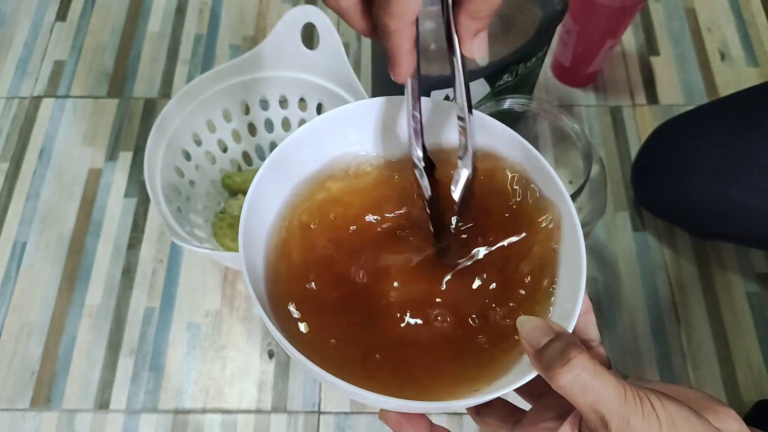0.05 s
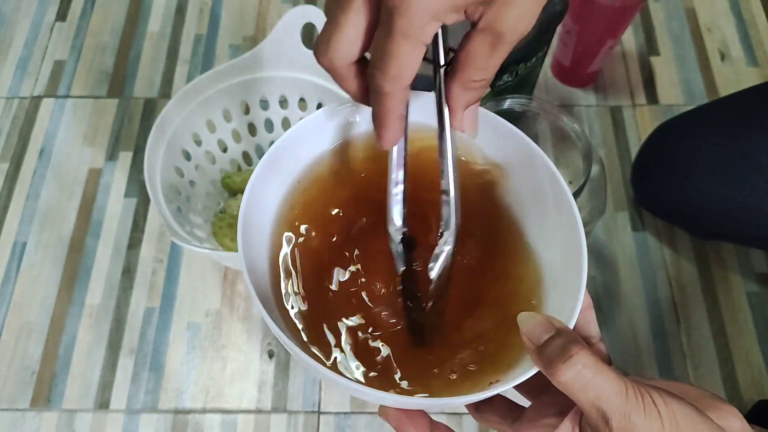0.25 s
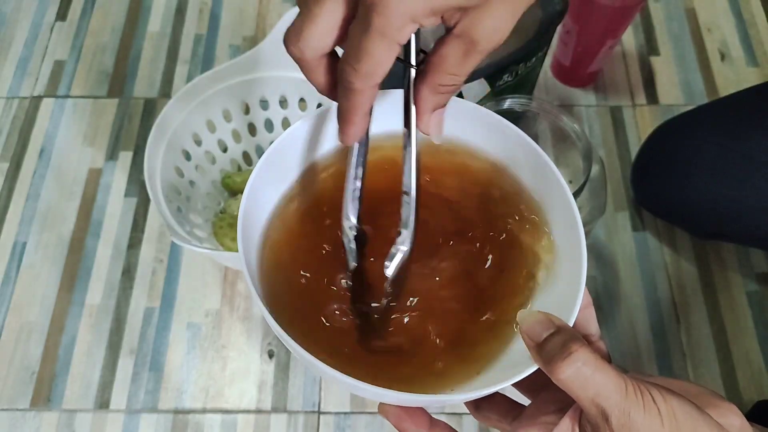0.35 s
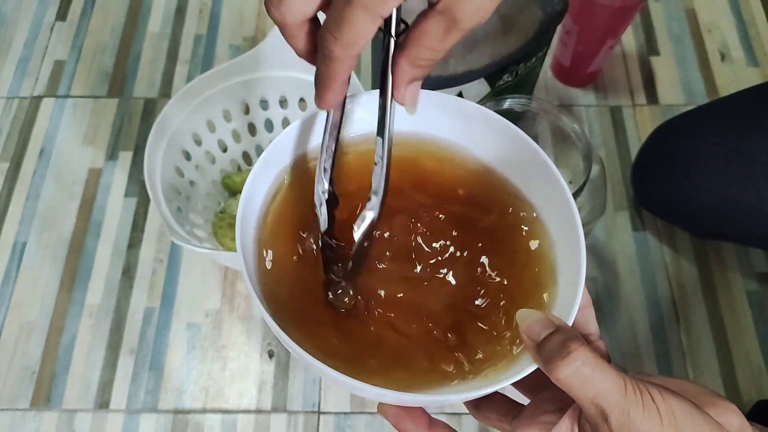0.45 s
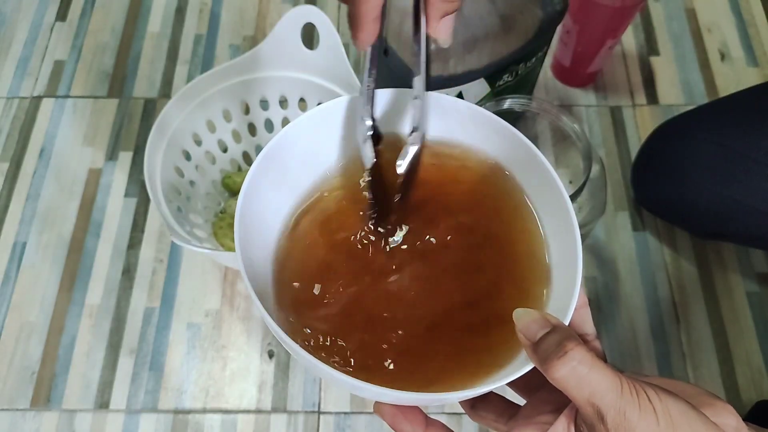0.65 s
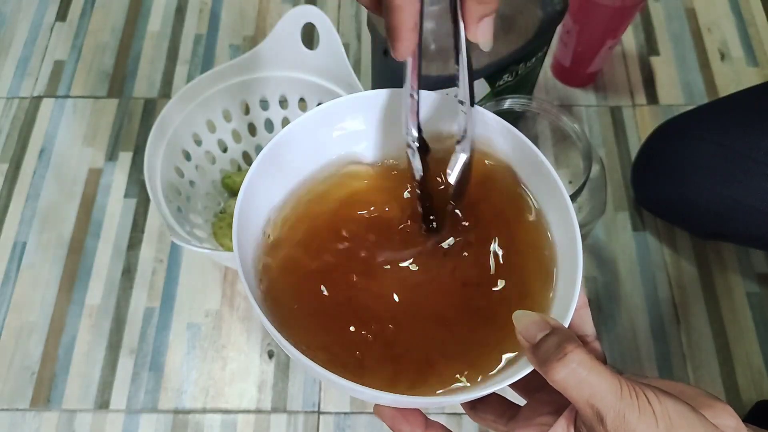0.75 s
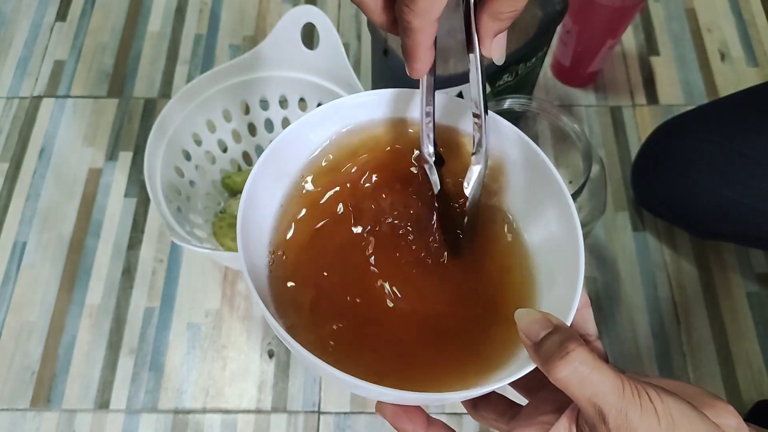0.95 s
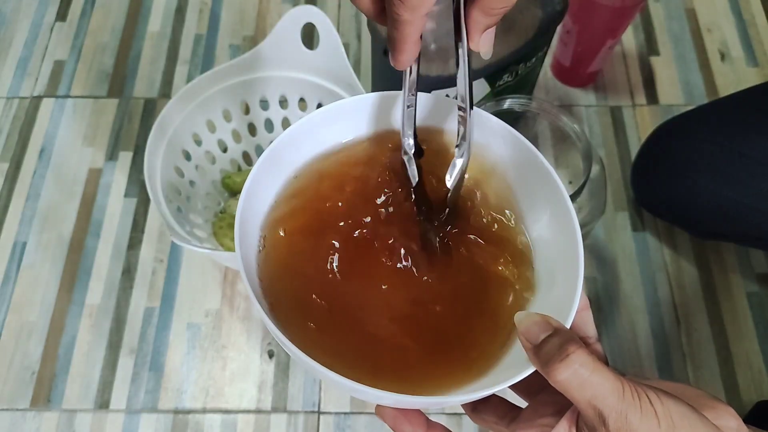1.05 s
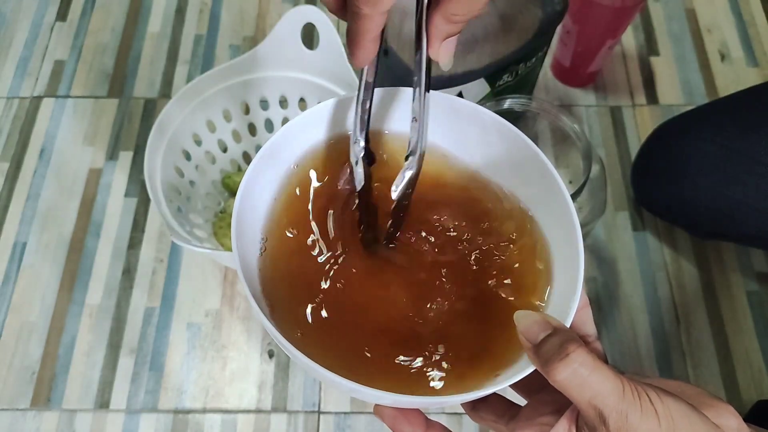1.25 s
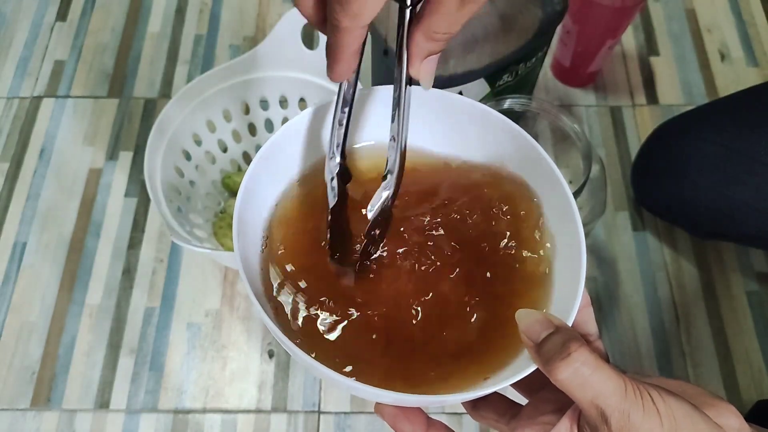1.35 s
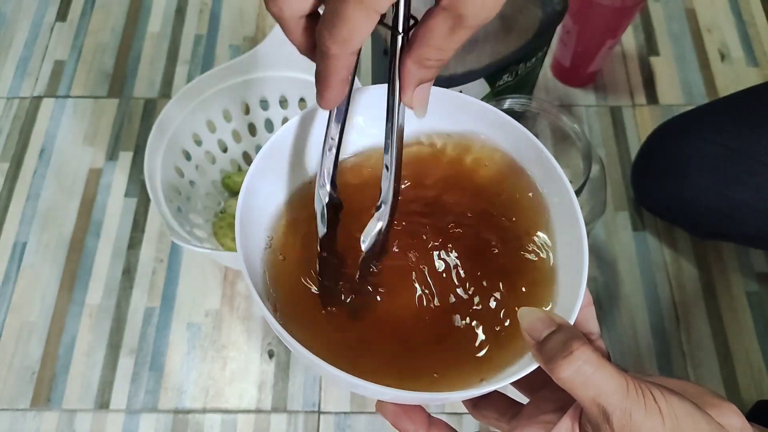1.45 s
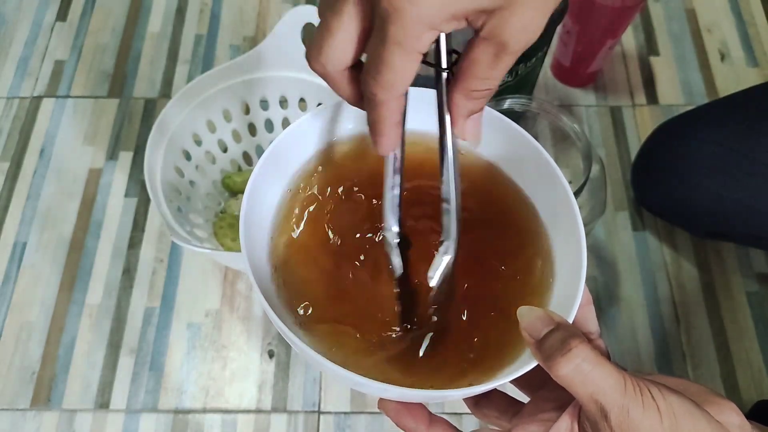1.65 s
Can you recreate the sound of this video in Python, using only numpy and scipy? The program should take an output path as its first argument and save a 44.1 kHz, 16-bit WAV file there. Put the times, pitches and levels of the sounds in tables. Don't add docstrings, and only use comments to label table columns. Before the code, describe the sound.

Metal tongs stirring sugary liquid in a thin plastic bowl: gritty scraping, irregular dull clicks and taps, a faint metallic ring early, louder knocks and a short squeak midway, then softer ticks; close stereo, quiet kitchen.

```python
import sys
import numpy as np
from scipy import signal
from scipy.fft import rfft, irfft
from scipy.io import wavfile
from scipy.ndimage import uniform_filter1d

SR = 44100
rng = np.random.default_rng(int(sys.argv[2]) if len(sys.argv) > 2 else 0)


def volts_from_decibels(level):
    exponent = np.asarray(level, float) / 20
    return 10 ** exponent


def pcm_store(signal):
    levels = np.round(np.clip(np.atleast_2d(signal), -1, 1) * 32767)
    wavfile.write(sys.argv[1], SR, levels.astype(np.int16).T)


N = 74970

# pitch [Hz], level [dB], t60 [s].
BOWL = [(342, -12, 0.14), (505.5, -12, 0.13), (783, -6, 0.2), (1000, -9.5, 0.026), (1182, -11.5, 0.14),
        (1620, -6, 0.051), (1910, 0, 0.02), (2290, -9, 0.013), (2330, -9, 0.27), (2470, -3.5, 0.035),
        (2710, -1, 0.027), (3064, -6.5, 0.1), (3250, -1.5, 0.015), (3847, -3, 0.026)]
# pitch [Hz], level [dB], t60 [s], left minus right [dB].
ARMS = [(3600, -20, .2, 0), (4388, -8, .35, -11), (4452, -1, .3, -12), (4510, -5, .3, -12),
        (5460, -17, .15, 0), (6710, -10, .25, 0), (6779, -2, .19, 2), (6848, -6, .19, 2),
        (8085, -16, .13, 3), (8878, -11, .19, 8), (9085, -11, .1, 8), (10530, -20, .2, 6),
        (12320, -22, .2, 0), (13345, -15, .25, -1)]

LAG_S, LEFT_DB, SPREAD_RAD = 6.6e-5, -2, 0.7
ARMS_TURN_RAD = 1.9
LOOSE_DB = -12.5


def evened(x):
    return x / np.sqrt(np.mean(x ** 2) + 1e-20)


def shaped(x, points):
    f, level = np.transpose(points)
    hz = np.fft.rfftfreq(x.shape[-1], 1 / SR)
    gain = volts_from_decibels(np.interp(np.log(hz + 1), np.log(f + 1), level))
    return irfft(rfft(x) * gain, x.shape[-1])


def fine(x, hz=4470):
    return signal.sosfilt(signal.butter(4, hz, "high", fs=SR, output="sos"), x)


def add(mix, s, sound):
    part = mix[..., max(round(s * SR), 0):][..., :sound.shape[-1]]
    part += sound[..., :part.shape[-1]]


def ports(left_db, turn):
    gain = volts_from_decibels(np.array([[left_db / 2], [-left_db / 2]]))
    return gain * np.exp(0.5j * turn * np.array([[-1], [1]]))


def lag_turn(hz):
    return 2 * np.pi * hz * LAG_S


def ring(x, hz, t60, left_db, twist):
    r = 10 ** (-3 / (t60 * SR))
    z = signal.lfilter([np.sqrt(1 - r * r)], [1, -r * np.exp(2j * np.pi * hz / SR)], x)
    return (ports(left_db, lag_turn(hz) + SPREAD_RAD * twist) * z).imag


def grit(size):
    grains_per_s, spread_db = 5000, 3
    u, e, g = rng.random(size), rng.exponential(1, size), rng.standard_normal(size)
    snaps = (u < grains_per_s / SR) * volts_from_decibels(spread_db * np.minimum(e, 3.5)) * np.sign(g)
    return evened(snaps + 0.054 * g)


def small_modes():
    # frequency [Hz], density [dB per Hz].
    colour = [(200, 6), (600, -19), (800, 1.5), (1500, -1.5), (3000, -1), (4400, -12), (7000, -8),
              (15800, -25.5)]
    t60, shared = 0.06, 0.36
    t = np.arange(3000) / SR
    a, b = rng.standard_normal(3000), rng.standard_normal((2, 3000))
    decaying = (shared * a + (1 - shared) * b) * volts_from_decibels(-60 * t / t60)
    return evened(shaped(decaying, colour)) / np.sqrt(3000)


def late(x):
    hz = np.fft.rfftfreq(len(x), 1 / SR)
    y = signal.fftconvolve(x[None], small_modes(), axes=1)[:, :len(x)]
    return irfft(rfft(y) * ports(LEFT_DB, lag_turn(hz)), len(x))


def bowl(x, hz, reach, twists, damp):
    out = 0
    for (f, db, t60), twist in zip(BOWL, twists):
        nearness = 0.066 + np.exp(-0.5 * (np.log2(f / hz) / reach) ** 2)
        out = out + volts_from_decibels(db) * nearness * ring(x, f, t60 * damp, LEFT_DB, twist)
    return out


def arms(x):
    out = 0
    for hz, db, t60, left_db in ARMS:
        twist = (ARMS_TURN_RAD - lag_turn(hz)) / SPREAD_RAD
        out = out + volts_from_decibels(db) * ring(x, hz, t60, left_db, twist)
    return out


def drag(twists):
    # time [s], pressure [dB], fine grit [dB].
    path = [(0, -30.5, -17), (.06, -44.5, -3.5), (.14, -48.5, 7.5), (.185, -35.5, -1), (.203, -36.5, -9),
            (0.214, -34, 3), (.3, -39, 0), (.45, -35, -9.5), (.53, -39, -14), (.615, -52.5, -21),
            (.66, -37.5, -19), (.78, -40, -8.5), (.88, -30, -34), (.95, -39.5, -22), (1.05, -43, -3.5),
            (1.17, -44, -8), (1.3, -47, -7), (1.418, -47, -24), (1.455, -75, -25), (1.5, -50.5, -18)]
    wander_db, wander_s = 4.5, 0.051
    s, press_db, fine_db = np.transpose(path)
    t = np.arange(N) / SR
    x = grit(N) * volts_from_decibels(np.interp(t, s, press_db))
    wander = uniform_filter1d(rng.standard_normal((len(BOWL), N)), round(wander_s * SR), axis=1)
    modes = 0
    for (hz, db, t60), v, twist in zip(BOWL, wander, twists):
        modes = modes + volts_from_decibels(db) * ring(x * volts_from_decibels(wander_db * evened(v)), hz, t60, LEFT_DB, twist)
    spots = np.arange(N) // 4000 % 3 == np.arange(3)[:, None]
    loose = sum(late(x * spot) for spot in spots)
    top = x * volts_from_decibels(np.interp(t, s, fine_db))
    crackle = sum(fine(late(top * spot)) for spot in spots)
    return volts_from_decibels(-18.5) * modes + volts_from_decibels(LOOSE_DB) * loose + volts_from_decibels(6) * crackle + volts_from_decibels(-15) * arms(top)


def air():
    # frequency [Hz], density [dB per Hz].
    colour = [(20, 0), (90, -13), (300, -9.5), (600, -24), (2800, -14), (5000, -24.5), (7000, -23),
              (15800, -26)]
    same = 0.22
    a, b, c = rng.standard_normal((3, N))
    hush = evened(shaped(np.array([a, same * a + np.sqrt(1 - same ** 2) * b]), colour))
    hum = evened(ring(c, 63, 0.25, LEFT_DB, 0))
    return volts_from_decibels(-54) * hush + volts_from_decibels(-67.5) * hum


def tap(s, db, hz, sharp_db, twists):
    blow_s = 0.000977
    t = np.arange(6000) / SR
    blow = t / blow_s * np.exp(-t / blow_s) * rng.standard_normal(6000)
    blow[round(1.5 * blow_s * SR)] += 6
    tick = late(blow)
    layers = bowl(blow, hz, 0.52, twists, 0.35), tick, fine(tick)
    body, tick, crack = [v / abs(v.mean(0)).max() for v in layers]
    sound = body + volts_from_decibels(-2) * tick + volts_from_decibels(min(sharp_db, -8)) * crack
    return s, volts_from_decibels(db) * fine(sound, 0.9 * min(hz, 770))


def rasp(s, length, db, hz, fine_db, twists):
    rise_s, fall_s = 0.0046, 0.012
    t = np.arange(8000) / SR
    x = grit(8000) * np.clip(np.minimum(t / rise_s, (length - t) / fall_s), 0, 1)
    loose = late(x)
    body = volts_from_decibels(1) * bowl(x, hz, 0.21, twists, 0.84)
    treble = volts_from_decibels(16.5) * fine(loose) + volts_from_decibels(-14) * arms(x)
    sound = body + volts_from_decibels(LOOSE_DB) * loose + volts_from_decibels(fine_db) * treble
    return s, volts_from_decibels(db) * fine(sound, 0.27 * hz)


def knock(s, db, hz, t60):
    rise_s = 0.00048
    t = np.arange(9000) / SR
    z = np.minimum(t / rise_s, 1) * volts_from_decibels(db - 60 * t / t60) * np.exp(2j * np.pi * hz * t)
    return s, (ports(LEFT_DB, lag_turn(hz)) * z).imag


def squeak(s, length, db, hz):
    edge_s, rough = 0.0038, 0.48
    t = np.arange(3000) / SR
    a, b = uniform_filter1d(rng.standard_normal((2, 3000)), 130, axis=1)
    flutter = 1 + rough * (evened(a) + 1j * evened(b))
    z = flutter * np.exp(2j * np.pi * hz * t)
    swell = np.clip(np.minimum(t, length - t) / edge_s, 0, 1)
    return s, volts_from_decibels(db) * swell * (ports(LEFT_DB, lag_turn(hz)) * z).imag


def chafe():
    start_s, rise_s, hold_s = 0.204, 0.017, 0.015
    grip_db, grip_s, rough = -13.5, 0.0064, 0.45
    t = np.arange(SR // 2) / SR
    after = np.maximum(t - rise_s - hold_s, 0)
    swell = np.minimum(t / rise_s, 1) * volts_from_decibels(grip_db * np.minimum(after / grip_s, 1))
    out = 0
    for hz, db, t60, left_db in ARMS:
        shake = 1 + rough * evened(uniform_filter1d(rng.standard_normal(len(t)), 150))
        z = shake * volts_from_decibels(db - 60 * after / t60) * np.exp(2j * np.pi * (hz * t + rng.random()))
        out = out + (ports(left_db, ARMS_TURN_RAD) * z).imag
    return start_s, volts_from_decibels(-18.5) * swell * out


def kitchen(x):
    t60, first_s, density = 0.25, 0.003, 0.05
    t = np.arange(SR // 2) / SR
    signs = np.sign(rng.standard_normal((2, len(t))))
    present = (rng.random((2, len(t))) < density) * (t > first_s)
    echoes = signs * present * volts_from_decibels(-60 * t / t60)
    return signal.fftconvolve(x, echoes / np.linalg.norm(echoes[0]), axes=1)[:, :N]


def scene():
    # start [s], peak [dB], struck pitch [Hz], sharpness [dB].
    tap_rows = [(0.002, -34.5, 794, -23), (0.029, -33, 2580, -8), (0.1, -66, 2710, -5),
                (0.112, -42, 2670, -18), (0.173, -51, 3400, -22), (0.181, -27, 3450, -5),
                (0.345, -28.5, 735, -1), (0.367, -38, 2420, -26), (0.38, -30.5, 2420, -23),
                (0.424, -34, 2800, -21), (0.453, -20.5, 783, -28), (0.492, -33, 715, -32),
                (0.51, -32.5, 930, -36), (0.655, -34, 2470, -9), (0.684, -30.5, 2770, 13),
                (0.724, -29, 2710, -13), (0.734, -34, 783, -3), (0.755, -32.5, 770, -7),
                (0.803, -18.5, 2580, -36), (0.866, -16, 1920, -55), (0.923, -32.5, 1090, -40),
                (0.939, -35.5, 2540, -33), (0.967, -33.5, 2300, -38), (0.989, -34.5, 1030, -5),
                (1.084, -36.5, 2720, -1), (1.257, -35.5, 790, -17), (1.275, -37, 2330, -8),
                (1.398, -35.5, 1320, -37), (1.532, -33, 2840, -8), (1.621, -37, 342, -9)]
    # start [s], length [s], level [dB], pitch [Hz], fine grit [dB].
    rasp_rows = [(0.074, 0.011, -36, 2780, -8.5), (0.1, 0.039, -45, 2930, 1),
                 (0.153, 0.042, -41, 3400, -14), (0.211, 0.028, -41.5, 2180, 5),
                 (0.349, 0.026, -43, 2520, -14), (0.404, 0.038, -49.5, 3000, -3.5),
                 (0.624, 0.014, -31.5, 2410, -18.5), (0.785, 0.012, -29, 2430, -14.5),
                 (0.803, 0.035, -35.5, 2680, -11.5), (0.824, 0.056, -34.5, 3260, -45),
                 (0.843, 0.029, -36, 1700, -9), (1.12, 0.021, -43.5, 1620, -13),
                 (1.185, 0.014, -40.5, 3000, -4.5), (1.216, 0.042, -45.5, 3240, -8.5),
                 (1.479, 0.026, -40.5, 3440, -8), (1.518, 0.025, -44.5, 3020, -1.5),
                 (1.646, 0.009, -41, 2320, -12), (1.661, 0.034, -48, 2600, -15),
                 (0.235, 0.025, -33.5, 330, -26), (1.609, 0.09, -64, 2450, 5),
                 (1.333, 0.034, -52, 2200, -8.5)]
    # start [s], peak [dB], pitch [Hz], t60 [s].
    knock_rows = [(.1815, -36, 1080, 0.034), (.102, -34.5, 2540, .04), (.114, -33.5, 2714, 0.076),
                  (.113, -46.5, 1153, .08), (.173, -31.5, 3550, 0.018), (.4535, -39.5, 781, 0.19),
                  (.454, -34, 1515, 0.039), (.509, -37.5, 796, 0.13), (.6265, -35.5, 885, 0.026),
                  (.6565, -42, 1140, .02), (.7335, -38.5, 847, 0.036), (.755, -32.5, 783, 0.095),
                  (.8035, -26.5, 2600, .03), (.8665, -21, 1030, 0.016), (.867, -20, 2264, 0.03),
                  (.867, -40.5, 330, 0.043), (.9675, -35.5, 1000, 0.022), (.9678, -34.5, 2450, 0.023),
                  (.9895, -32.5, 994, 0.024), (.99, -39, 2480, 0.028), (0.8992, -37, 2600, 0.016),
                  (.909, -38, 2760, 0.015), (0.926, -32, 2770, .015), (1.051, -47, 2360, 0.053),
                  (1.085, -39.5, 2475, 0.056), (1.197, -46, 3020, 0.028), (.868, -23.5, 1540, 0.015),
                  (1.527, -38, 1914, .03), (1.188, -44, 843, 0.037), (1.192, -38.5, 1450, 0.022),
                  (1.2575, -41, 797, 0.078), (1.2758, -37, 1600, 0.018), (1.276, -37, 2290, .025),
                  (1.3985, -42.5, 1264, 0.022), (1.399, -55, 1840, 0.02), (1.484, -42, 1464, 0.033),
                  (1.5255, -33, 2700, 0.042), (1.534, -31, 2730, 0.027), (1.535, -43.5, 1184, 0.082),
                  (1.62, -42.5, 1178, 0.069), (1.622, -41, 350, 0.069), (1.6225, -43, 2765, 0.057)]
    # start [s], length [s], level [dB], pitch [Hz].
    squeak_rows = [
        (0.102, 0.036, -51, 1880),
        (.165, 0.033, -50.5, 1000),
        (0.825, 0.0099, -28.5, 3250),
        (0.844, 0.035, -27.5, 3258),
        (0.848, .017, -32, 1616),
        (.91, .035, -49.5, 1045),
        (1.135, 0.021, -50, 1647),
        (1.241, .027, -48.5, 2860),
        (1.481, .014, -45.5, 3264),
        (1.478, 0.018, -45.5, 3900),
    ]
    twists = rng.standard_normal(14)
    mix = drag(twists)
    add(mix, *chafe())
    for row in rasp_rows:
        add(mix, *rasp(*row, twists))
    for row in tap_rows:
        add(mix, *tap(*row, twists))
    mix = fine(mix, 330)
    for row in squeak_rows:
        add(mix, *squeak(*row))
    for row in knock_rows:
        add(mix, *knock(*row))
    return mix + volts_from_decibels(-12) * kitchen(mix) + air()


def roll_off(x):
    return signal.sosfilt(signal.butter(12, 15830, fs=SR, output="sos"), x)


def record(dry):
    low_pass = signal.firwin(511, 15750, window=("kaiser", 9), fs=SR)
    mix = signal.oaconvolve(dry, low_pass[None], "same")
    return roll_off(mix)


dry = scene()
out = record(dry)
pcm_store(out)
```